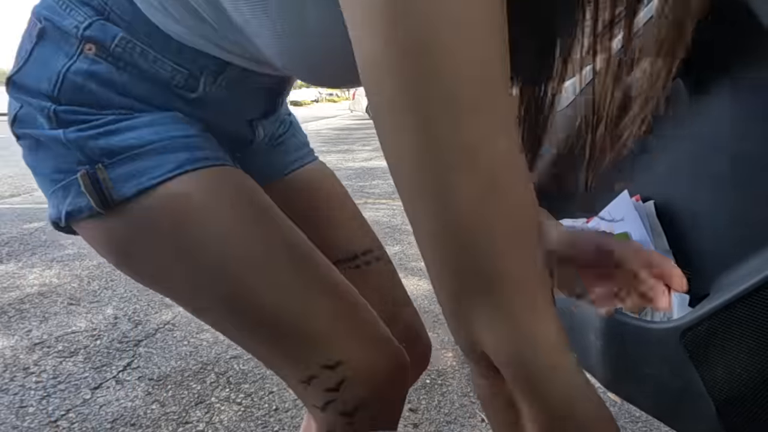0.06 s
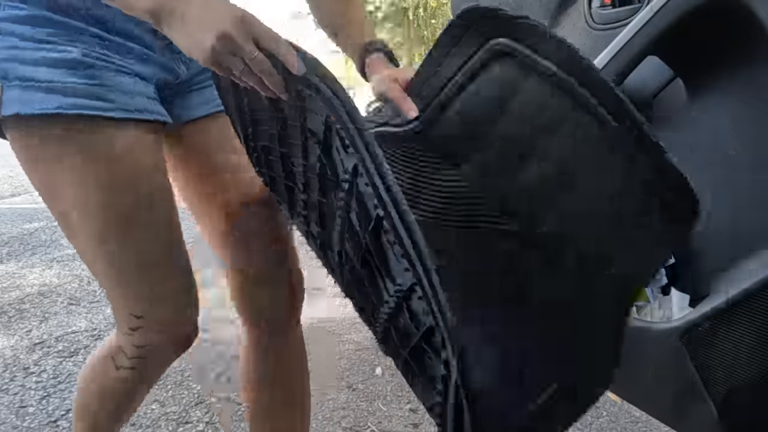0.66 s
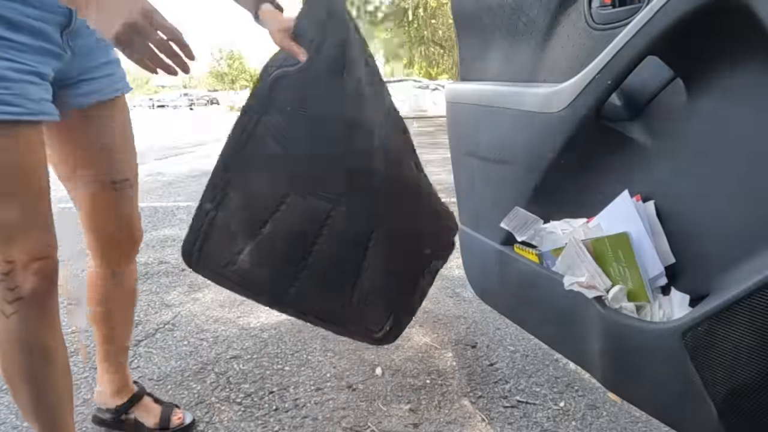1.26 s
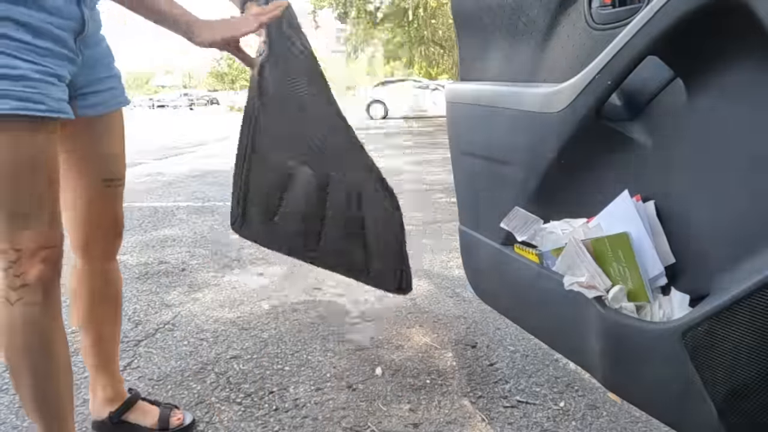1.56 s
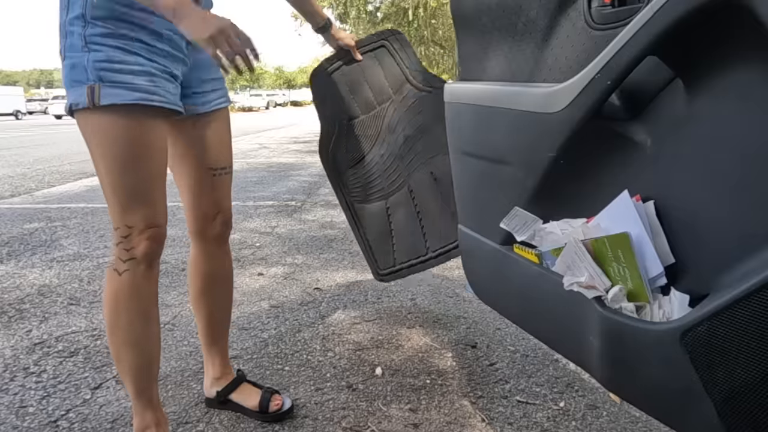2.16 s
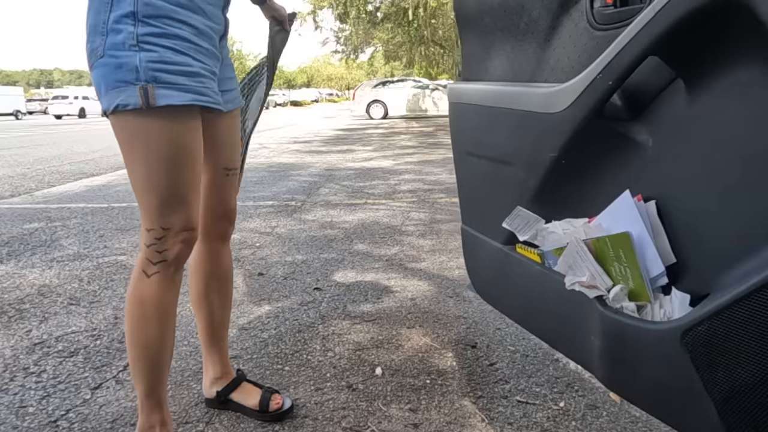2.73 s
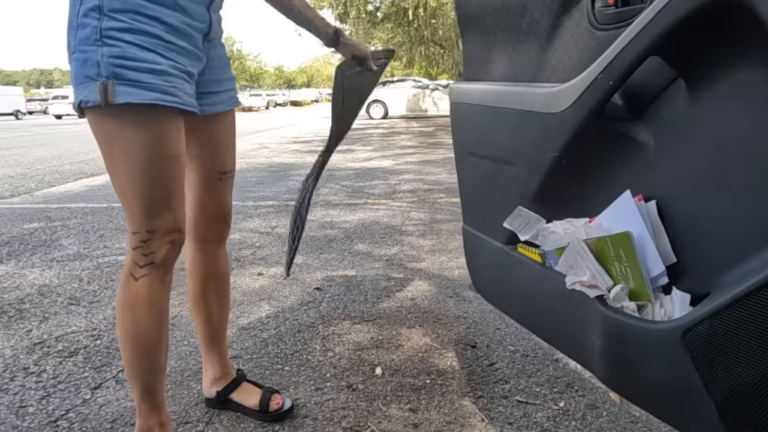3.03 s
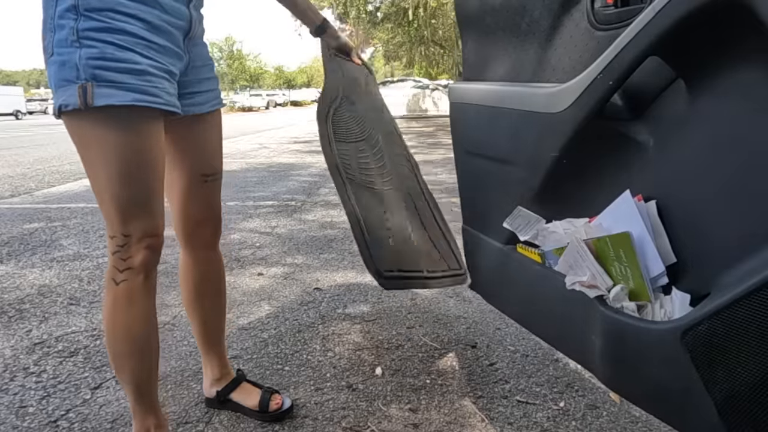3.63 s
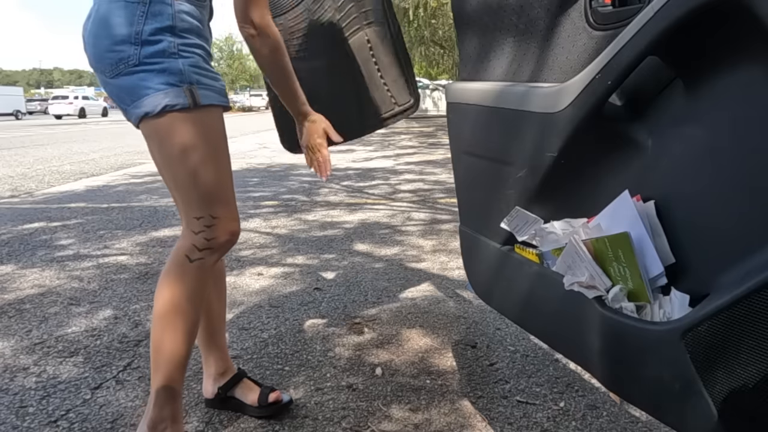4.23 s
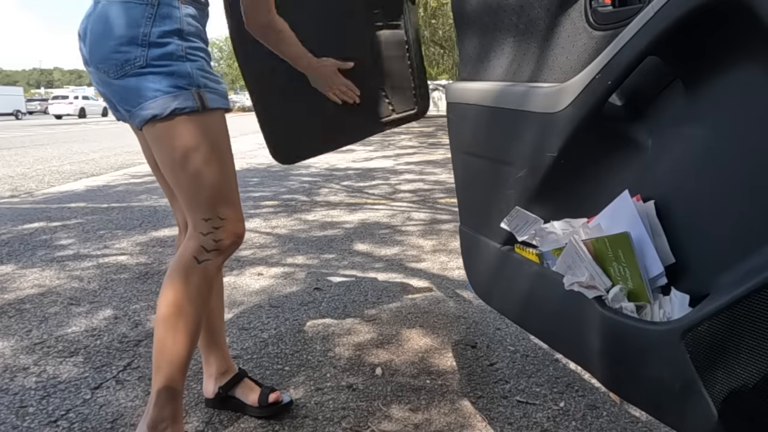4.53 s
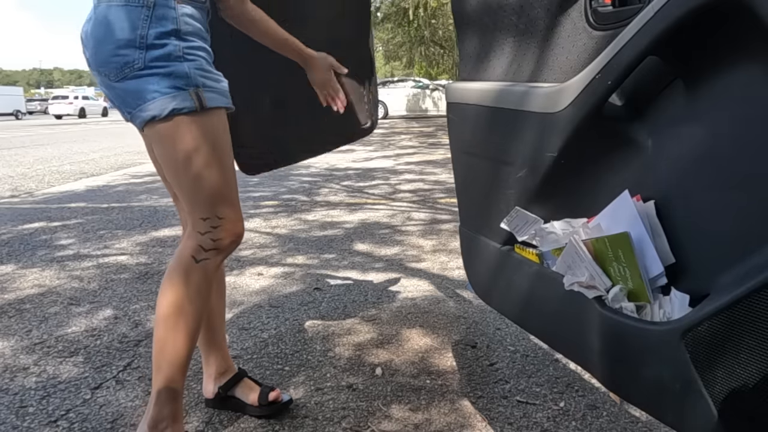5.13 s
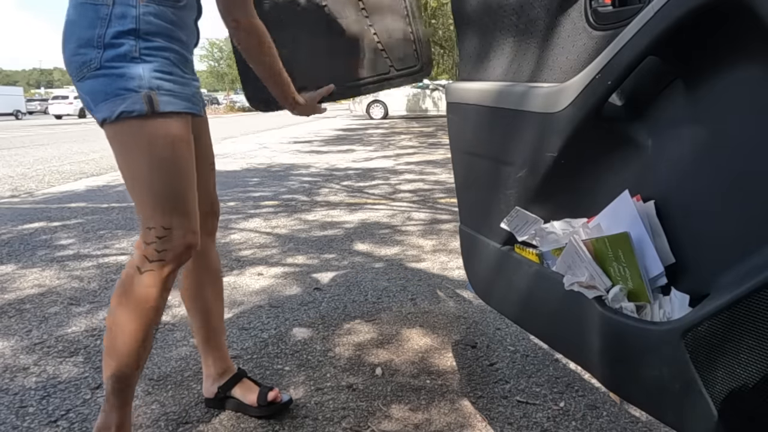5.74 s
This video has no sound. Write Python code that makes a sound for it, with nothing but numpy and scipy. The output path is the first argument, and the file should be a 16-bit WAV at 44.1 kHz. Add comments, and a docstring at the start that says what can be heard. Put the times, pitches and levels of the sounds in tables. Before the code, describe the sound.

Over a low engine rumble, a car mat scrapes, bangs twice on an open door and takes four sharp hand slaps.

```python
"""Rubber scrapes and carpet swishes, close by, as floor mats are pulled out of an idling car.
Open car park, a two-port stereo microphone beside the open door. One mat is swung twice against the
door, which smacks, booms and rattles into the cabin, then beaten four times by hand.
The engine rumbles underneath throughout and takes up load; its cooling fan starts just past half way."""
import sys
import numpy as np
from scipy import signal
from scipy.fft import rfft, irfft, next_fast_len
from scipy.io import wavfile
from scipy.ndimage import uniform_filter1d

SR = 44100
rng = np.random.default_rng(int(sys.argv[2]) if len(sys.argv) > 2 else 0)


def store_pcm(level_fs):
    """Save levels as 16-bit WAV."""
    pcm = np.round(np.clip(level_fs, -1, 1) * 32767).astype(np.int16)
    wavfile.write(sys.argv[1], SR, np.atleast_2d(pcm).T)


N = 264358

# part after part of the limp mat lands on the door, in two swings and their rebounds:
# (time [s], length [s], level [dB], tilt [dB/octave])
SMACKS = [(1.733, 0.0085, -25.5, 1.5), (1.7384, 0.026, -23.5, 0), (1.7603, 0.004, -18, -1),
          (1.769, 0.0026, -24, -1), (1.7795, 0.004, -19, -1), (1.792, 0.01, -22, -1.5),
          (1.804, 0.011, -23, -1), (1.9076, 0.0084, -25.5, -3.5), (2.115, 0.0042, -43, 2),
          (3.2635, .016, -18.5, 1.5), (3.291, 0.015, -18.5, -1.5), (3.32, 0.011, -30, -1.5),
          (3.3946, .003, -25, 0), (3.3984, 0.0018, -19, -1), (3.446, 0.0065, -30.5, -2.5),
          (3.469, .002, -35, -2.5), (3.56, 0.014, -34.5, 3.5), (3.581, 0.021, -37, 0.5)]
# its stiff edges knock on the panel: (time [s], length [s], level [dB], favoured pitch [Hz])
KNOCKS = [(1.733, 0.0079, -30, 1380), (1.752, 0.0089, -19.5, 1250), (1.8, 0.016, -20.5, 610),
          (1.806, 0.0053, -25, 1290), (1.824, 0.0087, -26.5, 1070), (1.903, .003, -46, 1140),
          (2.118, 0.023, -44, 880), (3.271, 0.017, -22, 1070), (3.295, 0.008, -30, 1180),
          (3.325, 0.011, -31, 425), (3.395, 0.0032, -27.5, 940), (3.562, 0.019, -33, 1080),
          (3.586, 0.033, -35.5, 1430)]
# its weight booms the whole door: (time [s], build-up [s], level [dB], favoured pitch [Hz])
BOOMS = [(1.77, 0.0051, -18.5, 160), (1.794, 0.018, -21, 200), (1.909, 0.0041, -34.5, 171),
         (3.272, 0.016, -17, 175), (3.32, 0.021, -26.5, 250), (3.397, 0.0094, -26.5, 128)]
# air shoved by mat or palm: (time [s], level [dB], pitch [Hz], swell [s])
THUDS = [(1.7739, -13.5, 187, .0045), (3.281, -17.5, 234, .006), (3.299, -18.5, 202, 0.0046),
         (3.324, -20.5, 260, 0.0027), (3.348, -18.5, 223, 0.0042), (4.0606, -15, 272, 0.0023),
         (4.061, -18, 133, 0.0036), (4.063, -25, 550, .003), (4.5982, -13.5, 205, 0.0012),
         (4.6071, -17.5, 190, 0.0032), (4.9312, -19, 263, 0.0025), (4.935, -10.5, 248, 0.0015),
         (5.2771, -7.5, 328, 0.00072), (5.289, -24, 453, 0.0027)]
# door trim shaken by the heavy blows: (time [s], level [dB])
RATTLES = [(1.82, -37), (3.315, -26.5), (3.405, -32)]
# four beats by hand, in each the palm claps and the rubber whips back:
# (time [s], length [s], burst [dB], snap [dB], snap pitch [Hz], ring [dB])
SLAPS = [(4.0603, .005, -20, -18, 2480, -34.5), (4.0668, 0.0028, -21, -14, 2940, -23.5),
         (4.073, 0.007, -35, -24, 3020, -32), (4.5968, 0.0032, -28, -24, 1240, -36),
         (4.6038, 0.00092, -16.5, -19, 1550, -32.5), (4.6044, 0.0012, -17.5, -11.5, 2490, -31),
         (4.9297, .002, -19, -13, 1200, -25.5), (4.9317, 0.0018, -20, -17, 2100, -22.5),
         (5.2772, 0.0027, -34, -23.5, 1040, -37), (5.2886, 0.002, -22.5, -23, 2630, -32),
         (5.2947, 0.0014, -27.5, -18, 3190, -33.5)]
# rubber dragged over the sill or down the door: (time [s], length [s], level [dB], ring [Hz])
SCRAPES = [(0.165, 0.023, -29, 1090), (0.197, 0.041, -30.5, 996), (0.246, 0.014, -35.5, 2040),
           (0.296, 0.091, -41, 2030), (0.351, 0.024, -30, 3470), (0.399, 0.0082, -27, 876),
           (0.4, 0.024, -29, 2960), (0.442, 0.012, -38, 1300), (0.456, 0.016, -31.5, 2020),
           (0.471, 0.011, -30.5, 3620), (0.483, 0.02, -34.5, 1870), (0.493, 0.0084, -30.5, 1920),
           (0.762, 0.017, -36, 1280), (1.926, 0.1126, -37.5, 1270)]
# carpet pile sliding: (time [s], swell [s], level [dB])
SWISHES = [(0.015, 0.12, -54), (0.643, 0.097, -38.5), (0.7, 0.34, -62.5), (1.04, 0.0073, -65),
           (1.25, .02, -54), (1.337, 0.014, -50), (1.9, 0.088, -59.5)]
# short glides: (time [s], length [s], level [dB], start pitch [Hz], end pitch [Hz])
SQUEAKS = [(1.734, 0.03, -26, 1520, 1180), (3.298, 0.017, -18.5, 1330, 1560),
           (1.982, 0.05, -38.5, 470, 530), (2.018, 0.046, -37.5, 575, 615), (2.003, .03, -45, 740, 830),
           (1.998, 0.032, -42, 1270, 1335), (3.1, 0.067, -55, 3350, 2650)]
# small high ticks, and a brief thin whistle on the second hand slap: (time [s], level [dB], ring [Hz])
TICKS = [(0.182, -62, 7000), (0.256, -45, 6800), (0.608, -47, 9500), (0.647, -55, 11000),
         (0.658, -50, 10000), (0.935, -48, 5500), (1.061, -41, 3170), (1.27, -61, 6000), (1.361, -58, 6000),
         (1.487, -40, 5370), (2.023, -49, 5950), (2.117, -64, 6500), (2.212, -48, 7300), (2.31, -46, 7350),
         (4.605, -45, 12000)]
# hands and clothes on the mats: (time [s], level [dB])
RUSTLE_LEVEL = [(0, -39.5), (.15, -40), (.55, -45.5), (.9, -44), (1.4, -49), (1.7, -63), (2.3, -78)]

# modes of the door panel, the whole door and the stiff mat: (frequency [Hz], level [dB], t60 [s])
PANEL_MODES = [(425, -5, .06), (525, -7, .05), (610, -4.5, .07), (715, -6, .04), (800, -7, .025),
               (900, -6, .03), (1071, -3, .05), (1180, -3, .04), (1280, -3, .025), (1400, -3, .025),
               (1490, -5, .025), (1670, -5, .035), (1930, -5, .045), (2240, -7, .04)]
DOOR_MODES = [(105, 12.5, 0.033), (131.6, -5.5, 0.18), (171, 9.5, 0.028), (198.2, 0.5, 0.17),
              (240, -0.5, 0.038), (282, 0, 0.06), (309, -6.5, 0.043), (375, -19, 0.08)]
MAT_MODES = [(604, 15, 0.044), (1770, 3.5, 0.025), (2343, 5, 0.034), (2540, -9, 0.044), (2980, 3.5, 0.033),
             (3600, -4.5, 0.058), (3760, -1, 0.023)]
# engine orders: (multiple of the throb rate [1], level [dB])
ENGINE_ORDERS = [(1, 0.5), (2, -13.5), (3, -20.5), (4, -17)]
# fan blade tones: (frequency [Hz], level relative to the fan's rush [dB])
FAN_TONES = [(430.7, -9.5), (506.5, -6), (759.5, -9), (1013, -14)]

# noise spectra of the mats and the door, close by: (frequency [Hz], relative density [dB])
SMACK_SPECTRUM = [(150, 11.5), (400, 3), (700, 6), (1000, 3.5), (1500, 9), (2200, 3.5), (3400, 2),
                  (4300, -10), (6000, -9), (7800, -15.5), (9000, -24), (11500, -31), (14500, -45)]
RATTLE_SPECTRUM = [(150, -7), (350, 0.5), (700, 3.5), (1000, 5), (1600, -2.5), (2400, -17), (3600, -28),
                   (4500, -27), (12000, -45)]
SLAP_SPECTRUM = [(300, 5.5), (750, -2), (1200, 6.5), (1700, 1), (2400, 1.5), (3100, -0.5), (3700, -2.5),
                 (4300, -12), (6200, -11.5), (7800, -15.5), (9000, -25.5), (14000, -33)]
SCRAPE_SPECTRUM = [(100, 9), (200, 10.5), (290, -11), (420, 4.5), (600, -1.5), (950, 2), (1500, -1.5),
                   (2200, -5), (3300, -4), (4200, -14), (7400, -20.5), (9000, -34.5), (14000, -47)]
SWISH_SPECTRUM = [(200, -19), (800, -6), (1600, 2.5), (3400, 4), (4400, -3.5), (7400, -3), (9000, -11),
                  (11500, -16), (14500, -28)]
RUSTLE_SPECTRUM = [(150, 13), (450, 2), (1000, -4), (1900, -5.5), (3300, -9), (4400, -19.5), (7500, -27.5),
                   (12000, -45)]
TICK_SPECTRUM = [(300, -36), (1200, -4), (3200, 2), (4300, -4.5), (7000, -8), (8800, -12), (11000, -19),
                 (14500, -34)]
# noise spectra of the car and the open air behind them: (frequency [Hz], relative density [dB])
EXHAUST_SPECTRUM = [(12, -6.5), (22, 8), (40, -1), (65, -1.5), (90, 0.5), (120, -4), (160, -15.5),
                    (240, -18.5), (330, -43.5), (600, -48), (2000, -78)]
FAN_SPECTRUM = [(100, 12), (250, -24), (430, 4), (650, -3), (850, 3.5), (1400, -2.5), (2200, -5.5),
                (3400, -10), (4400, -20), (7000, -23.5), (12000, -54)]
AIR_SPECTRUM = [(100, 7.5), (300, 4.5), (700, -6), (1300, -5.5), (2100, -14), (3400, -11.5), (4300, -24),
                (6000, -22.5), (7700, -30.5), (9000, -38), (11000, -37), (14500, -73)]
# the microphone's two ports: (frequency [Hz], left minus right [dB], left lag [rad], diffuse share [dB])
MIC_PORTS = [(25, -1.3, 0, -19), (70, -.2, 0, -25), (250, -1, .05, -19), (650, -1.6, .1, -17),
             (1450, -1.6, .16, -16), (2450, -.1, .55, -13), (3400, 0, 1.1, -12), (4700, -3.8, .4, -8),
             (6700, -.7, .2, -10), (10500, .7, 0, -12)]


def door_blows():
    """The limp mat rolls onto the door: ribs smack, edges knock on the panel, the whole door booms."""
    out = np.zeros(N)
    for s, length, db, tilt_db in SMACKS:
        shudder = judder(depth_db=2.5, rate=250)
        touch = contact(0.0015, length, t60=0.079, grain_db=1.5)
        ribs = touch * shudder * crackle(per_s=3500, between_db=-6)
        add(out, s, from_db(db) * colour(ribs, SMACK_SPECTRUM, tilt_db))
    for s, length, db, hz in KNOCKS:
        touch = contact(0.0013, length, t60=0.057, grain_db=1)
        add(out, s, from_db(db) * struck(PANEL_MODES, touch, hz, focus_db=11, detune=0.0072))
    for s, build, db, hz in BOOMS:
        weight = contact(build, build, t60=0.16, grain_db=3)
        add(out, s, from_db(db) * struck(DOOR_MODES, weight, hz, focus_db=9))
    return out


def hand_beats():
    """Each slap squeezes out a burst of air, snaps at a pitch of its own and leaves the rubber ringing."""
    out = np.zeros(N)
    swell_cycles = 1.4
    for s, length, burst_db, snap_db, hz, ring_db in SLAPS:
        burst = contact(0.00064, length, t60=0.019, grain_db=0.5)
        add(out, s, from_db(burst_db) * colour(burst, SLAP_SPECTRUM))
        add(out, s, from_db(snap_db) * pulse(hz, swell_cycles / hz))
        add(out, s, from_db(ring_db) * struck(MAT_MODES, np.ones(1), hz, focus_db=14))
    return out


def thuds():
    """The mat's broad face shoves the air as it lands on the door or the palm drives into it."""
    out = np.zeros(N)
    for s, db, hz, swell in THUDS:
        add(out, s, from_db(db) * pulse(hz, swell))
    return out


def door_rattles():
    """The shaken trim chatters on for a moment, dull and uneven."""
    out = np.zeros(N)
    for s, db in RATTLES:
        chatter = contact(0.017, 0.01, t60=0.19, grain_db=1.5) * crackle(per_s=900, between_db=-7)
        add(out, s, from_db(db) * colour(chatter, RATTLE_SPECTRUM))
    return out


def scrapes():
    """Ribbed rubber judders over an edge; a tighter grip rings higher, brighter and less pure."""
    out = np.zeros(N)
    mid_hz = 1720
    for s, length, db, ring_hz in SCRAPES:
        grip = np.log2(ring_hz / mid_hz)
        shudder = judder(depth_db=3, rate=280)
        touch = contact(0.095 * length, length, t60=0.037, grain_db=0)
        slips = touch * shudder * crackle(per_s=1000, between_db=0.5)
        scrape = colour(slips, SCRAPE_SPECTRUM, tilt_db=1.5 * grip,
                        ring_hz=ring_hz, ring_db=10.5 - 1.5 * grip, ring_octaves=0.13)
        add(out, s, from_db(db) * scrape)
    return out


def swishes():
    """Each slide of the sandy carpet swells quickly and trails off."""
    level = np.zeros(N)
    for s, swell, db in SWISHES:
        age = np.maximum(clock() - s, 0) / swell
        level += from_db(db) * (age * np.exp(1 - age)) ** 2.94
    flutter = from_db(drift(40) + 0.51 * drift(250))
    return level * flutter * colour(grains(grain_db=4.5, size=N), SWISH_SPECTRUM)


def rustle():
    """Hands and clothes brush the mats in dull clumps of soft grains."""
    db = np.interp(clock(), *np.transpose(RUSTLE_LEVEL))
    return from_db(db + 1.2 * drift(45)) * colour(grains(grain_db=4.5, size=N), RUSTLE_SPECTRUM)


def high_ticks(count=10, from_s=0.69, to_s=1.5, fine_db=-54.5, low_hz=2030, ring_cycles=180):
    """Small high ticks, some at random, and a brief thin whistle on the second hand slap."""
    out = np.zeros(N)
    fine = [(from_s + (to_s - from_s) * when, fine_db, low_hz * 2 ** (2 * pitch))
            for when, pitch in rng.random((count, 2))]
    for s, db, ring_hz in TICKS + fine:
        touch = contact(0.0017, 0.0012, t60=ring_cycles / ring_hz, grain_db=-1)  # higher dies sooner
        tick = colour(touch, TICK_SPECTRUM, ring_hz=ring_hz, ring_db=13, ring_octaves=0.22)
        add(out, s, from_db(db) * tick)
    return out


def squeaks(wobble=0.03, rough_db=4):
    """Thin, unsteady glides that swell and fade around the blows on the door."""
    out = np.zeros(N)
    for s, length, db, start_hz, end_hz in SQUEAKS:
        along = ramp(s, length)
        hz = (start_hz + (end_hz - start_hz) * along) * (1 + wobble * drift(136))
        out += from_db(db + rough_db * drift(240)) * np.sin(np.pi * along) * tone(hz)
    return out


def engine(load_s=2.3, idle_hz=23.3, loaded_hz=26.62, idle_db=-32.5, loaded_db=-22):
    """The idling engine takes up load: its throb grows quickly, its speed follows slowly."""
    hz = idle_hz + (loaded_hz - idle_hz) * ramp(load_s, 1.3)
    hz *= 1 + 0.01213 * drift(4.95)
    db = idle_db + (loaded_db - idle_db) * ramp(load_s, 0.39)
    throb = sum(tone(hz * order) * from_db(level + 1.5 * drift(2.8)) for order, level in ENGINE_ORDERS)
    return from_db(db) * throb


def drone(peak_s=1.64, peak_db=-25.5, rise_db_per_s=3, fall_db_per_s=31, start_hz=43.5, sag_hz=1.8):
    """A low drone swells, then sags in pitch as it fades."""
    since = clock() - peak_s
    db = peak_db + np.minimum(rise_db_per_s * since, -fall_db_per_s * since)
    hz = start_hz - sag_hz * ramp(peak_s, 0.41)
    return from_db(db + 2 * drift(24)) * tone(hz)


def exhaust():
    """The exhaust rumbles low and slightly uneven."""
    return from_db(-27 + drift(5.7)) * wash(EXHAUST_SPECTRUM)


def cooling_fan():
    """The fan's rush and wavering blade tones fade in, then hold."""
    speed = 1 + 0.011 * drift(14)
    blades = sum(from_db(db + 3.4 * drift(3.9)) * tone(hz * speed) for hz, db in FAN_TONES)
    return from_db(-45) * ramp(start_s=3.54, length_s=0.38) * (wash(FAN_SPECTRUM) + blades)


def open_air():
    """The car park's near-steady wash, behind everything else."""
    return from_db(-43 + 0.11 * drift(26)) * wash(AIR_SPECTRUM)


def cabin_echo(x, dull_hz=2430):
    """The open cabin beside the microphone answers with a dull echo."""
    lowpass = signal.butter(2, dull_hz, fs=SR, output="sos")
    return signal.sosfilt(lowpass, from_db(-9.5) * scatter(x, t60=0.41))


def microphone(x):
    """Two close ports: nearly alike in the bass, shaded and delayed by the housing in the treble."""
    hz, *columns = np.transpose(MIC_PORTS)
    size = next_fast_len(N + SR // 10)
    log_hz = np.log(np.maximum(np.fft.rfftfreq(size, 1 / SR), 1))
    lean_db, lag, diffuse_db = [np.interp(log_hz, np.log(hz), c) for c in columns]
    sides = np.array([[1], [-1]])
    direct = rfft(np.pad(x, (0, size - N), "linear_ramp")) * np.exp(-0.5j * sides * lag)
    # reflections arrive from the sides and shift as body and mat move
    turn = np.pi * drift(1.86)
    stray = np.cos(turn) * scatter(x, t60=0.03) + np.sin(turn) * scatter(x, t60=0.03)
    diffuse = rfft(np.pad(stray, (0, size - N), "linear_ramp")) * from_db(diffuse_db) * sides
    return irfft((direct + diffuse) * from_db(sides * lean_db / 2), size)[:, :N]


def struck(modes, push, favoured_hz, focus_db, detune=0.017):
    """A pushed body rings, focus_db weaker per octave from the favoured pitch; peak power 1."""
    t = clock()[:SR // 2]
    tap = np.zeros(len(t))
    for hz, db, t60 in modes:
        strength = rng.choice([-1, 1]) * from_db(db - focus_db * abs(np.log2(hz / favoured_hz)))
        pitch = hz * (1 + detune * rng.standard_normal())  # the load shifts each mode a little
        tap += strength * from_db(-60 * t / t60) * np.sin(2 * np.pi * pitch * t)
    sound = signal.fftconvolve(push, tap)
    return sound / np.sqrt(uniform_filter1d(sound ** 2, size=SR // 50).max())


def contact(rise_s, length_s, t60, grain_db):
    """A crowd of tiny impacts that builds up, lasts as long as the contact, and dies away."""
    t = clock()[:SR // 2]
    release = from_db(-60 * np.maximum(t - length_s, 0) / t60)
    return grains(grain_db, len(t)) * np.minimum(t / rise_s, 1) * release


def grains(grain_db, size):
    """Tiny impacts of random sign and uneven size; unit power."""
    signs = rng.choice([-1, 1], size)
    return rms_one(signs * from_db(grain_db * np.minimum(rng.exponential(1, size), 5)))


def judder(depth_db, rate):
    """Uneven stick and slip of rubber, as a gain of unit power."""
    return rms_one(from_db(depth_db * np.tanh(drift(rate)[:SR // 2])))


def crackle(per_s, between_db):
    """Separate tiny snaps over a steady rub, as a gain of unit power."""
    snaps = rng.random(SR // 2) < per_s / SR
    return rms_one(rms_one(snaps.astype(float)) + from_db(between_db))


def pulse(hz, swell_s):
    """A few cycles under an envelope that swells to 1 and dies quickly."""
    t = clock()[:SR // 8]
    return t / swell_s * np.exp(1 - t / swell_s) * np.sin(2 * np.pi * hz * t)


def scatter(x, t60):
    """A dense spray of reflections that dies away; unit power gain."""
    t = clock()[:SR // 2]
    tail = rng.standard_normal(len(t)) * from_db(-60 * t / t60)
    return signal.oaconvolve(x, tail / np.linalg.norm(tail))[:N]


def colour(x, spectrum, tilt_db=0, ring_hz=1000, ring_db=0, ring_octaves=0.26, size=8192):
    """Causal (minimum-phase) filter of unit power gain, with a tilt per octave and one resonance."""
    octave = np.log2(np.maximum(np.fft.rfftfreq(size, 1 / SR), 1))
    hz, db = np.transpose(spectrum)
    tilt = tilt_db * np.maximum(octave, np.log2(hz[1]))
    resonance = ring_db / (1 + ((octave - np.log2(ring_hz)) / ring_octaves) ** 2)
    gain = from_db(np.interp(octave, np.log2(hz), db) + tilt + resonance)
    cepstrum = irfft(np.log(gain))[:size // 2]
    cepstrum[1:] *= 2
    response = irfft(np.exp(rfft(cepstrum, size)))[:size // 2]
    return signal.oaconvolve(x, response / np.linalg.norm(response))[:len(x)]


def wash(spectrum):
    """Steady noise of unit power."""
    return colour(rng.standard_normal(N), spectrum)


def tone(hz):
    """Sine of unit power that follows a pitch curve."""
    return np.sqrt(2) * np.sin(2 * np.pi * (np.cumsum(hz) / SR + rng.random()))


def drift(rate):
    """Random wander of spread 1, mostly slower than rate [Hz]."""
    step, settle = 40, 2000
    pole = np.exp(-2 * np.pi * step * rate / SR)
    noise = rng.standard_normal(N // step + settle + 2)
    slow = signal.lfilter([1], [1, -2 * pole, pole * pole], noise)[settle:]
    return np.interp(np.arange(N) / step, np.arange(len(slow)), rms_one(slow))


def ramp(start_s, length_s):
    """Goes evenly from 0 to 1, then holds."""
    return np.clip((clock() - start_s) / length_s, 0, 1)


def add(track, s, sound):
    """Mix a short sound in at time s."""
    at = max(0, round(s * SR))
    track[at:at + len(sound)] += sound[:N - at]


def clock():
    """Time of every sample."""
    return np.arange(N) / SR


def from_db(db):
    """Decibels to gain."""
    return 10 ** (np.asarray(db) / 20)


def rms_one(x):
    """Scale to unit power."""
    return x / np.sqrt(np.mean(x ** 2) + 1e-20)


def scene():
    """From beside the open door: mats close to the microphone, the running car underneath."""
    door = door_blows() + door_rattles()
    cabin = cabin_echo(door)
    slaps = hand_beats()
    bounce = from_db(-12) * scatter(slaps, t60=0.079)  # off the door and the ground
    handling = scrapes() + swishes() + rustle() + high_ticks() + squeaks()
    background = engine() + drone() + exhaust() + open_air() + cooling_fan()
    return microphone(door + cabin + thuds() + slaps + bounce + handling + background)


def record(dry):
    """A steep high cut after the microphone."""
    cutoff_hz = 14400
    return signal.sosfilt(signal.ellip(10, 0.2, 80, cutoff_hz, fs=SR, output="sos"), dry)


dry = scene()
out = record(dry)
store_pcm(out)
```